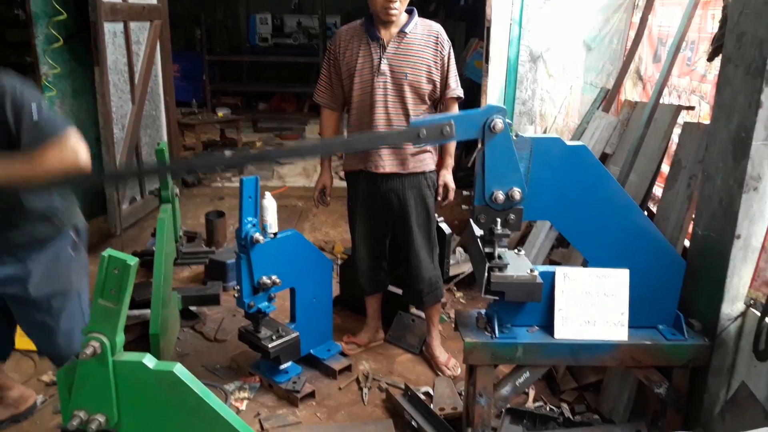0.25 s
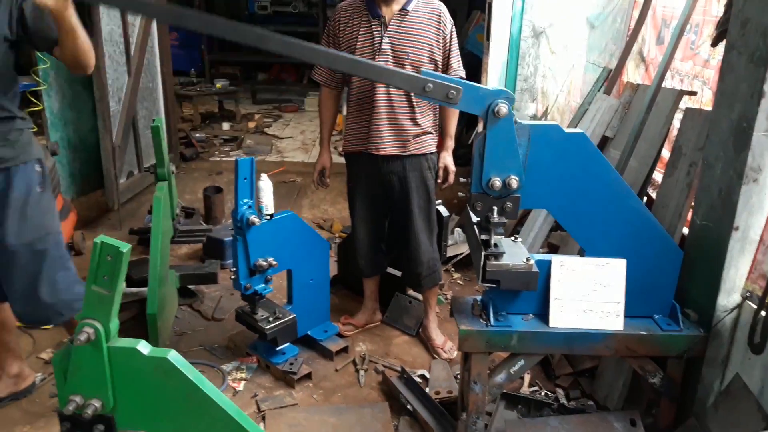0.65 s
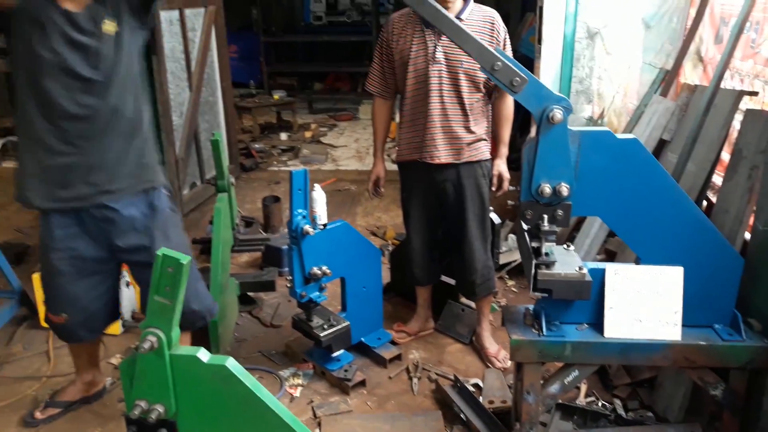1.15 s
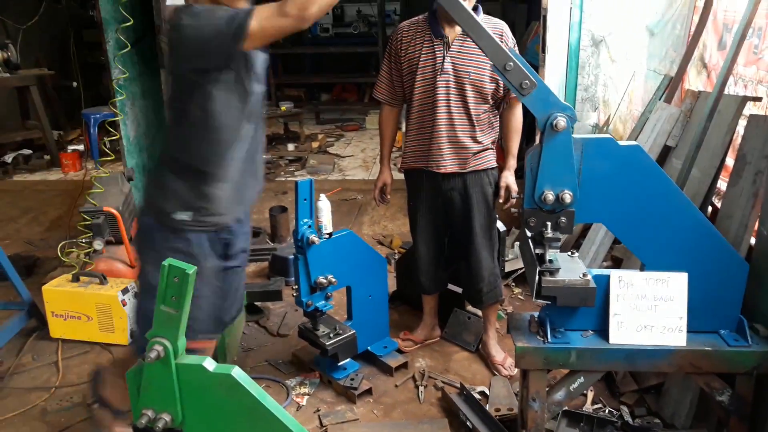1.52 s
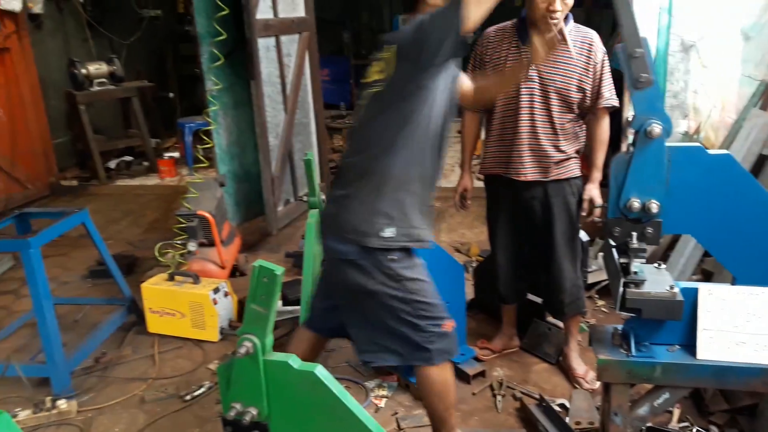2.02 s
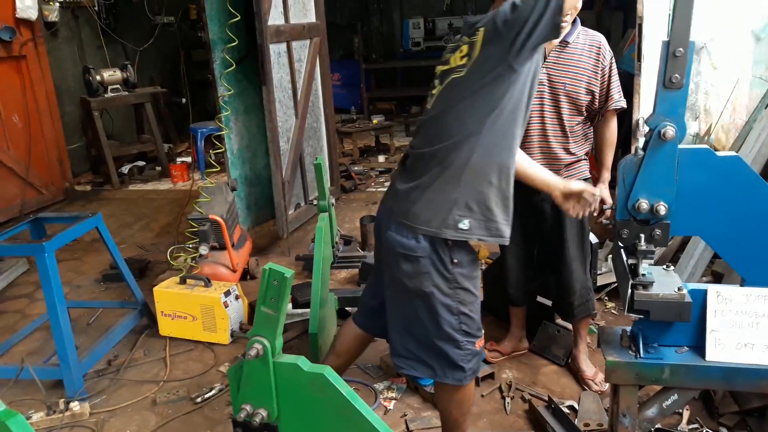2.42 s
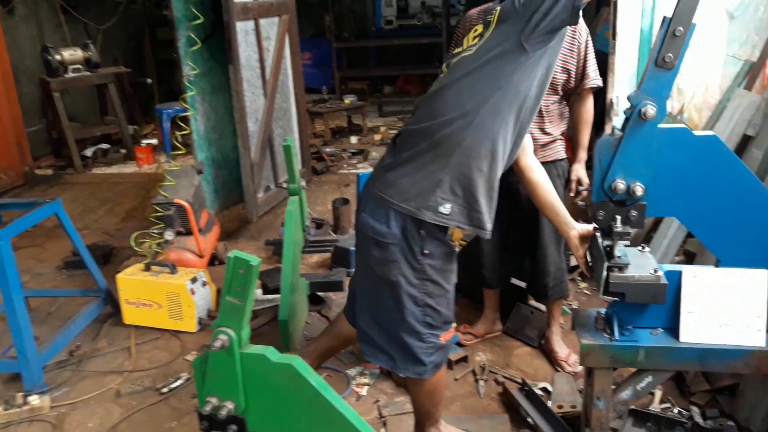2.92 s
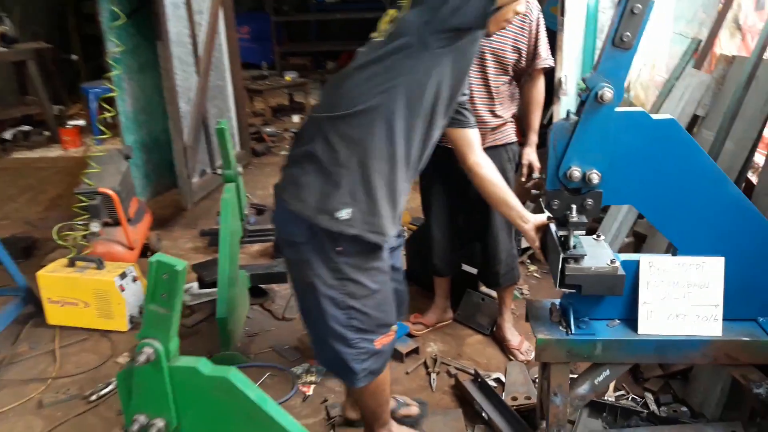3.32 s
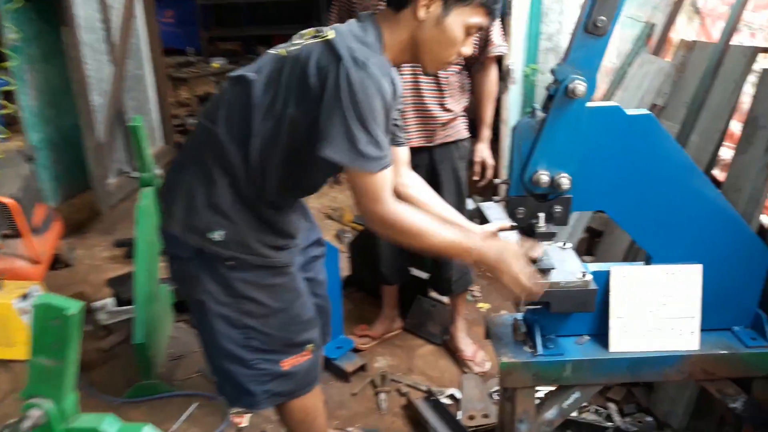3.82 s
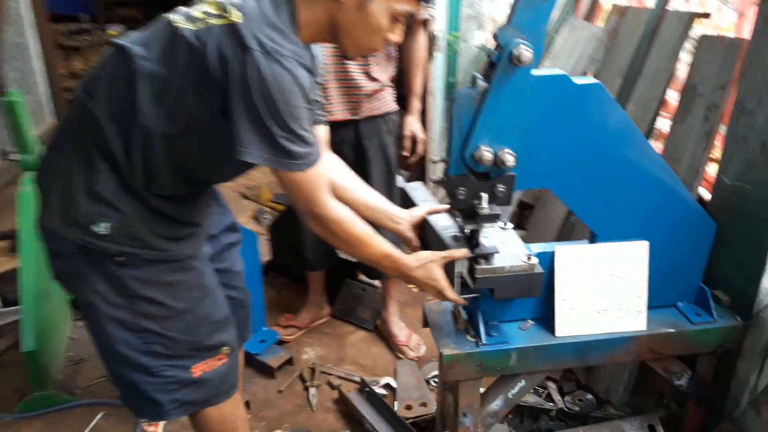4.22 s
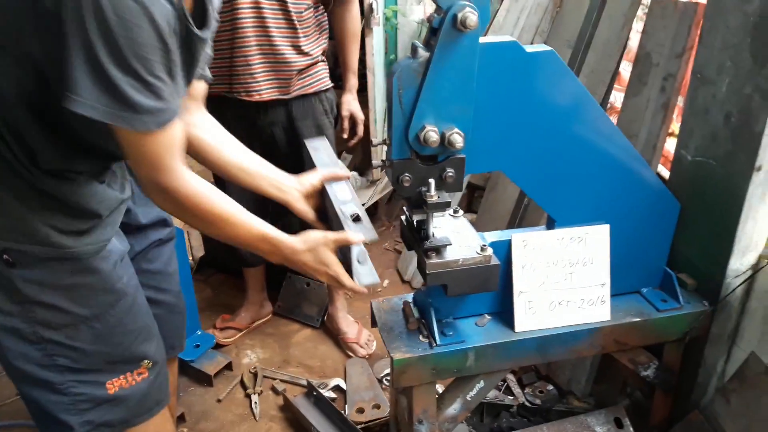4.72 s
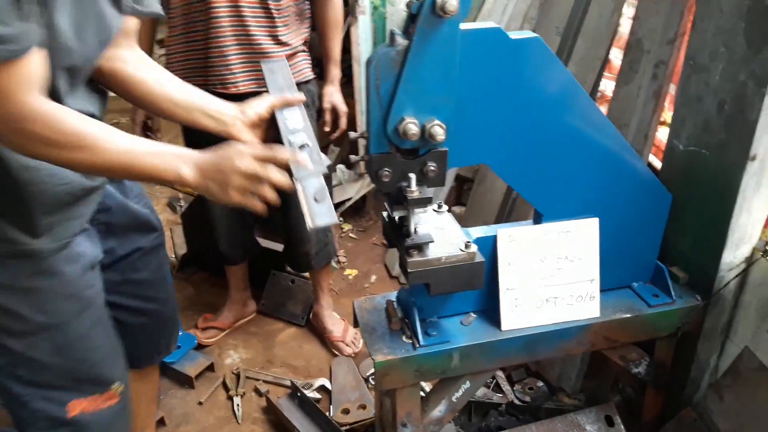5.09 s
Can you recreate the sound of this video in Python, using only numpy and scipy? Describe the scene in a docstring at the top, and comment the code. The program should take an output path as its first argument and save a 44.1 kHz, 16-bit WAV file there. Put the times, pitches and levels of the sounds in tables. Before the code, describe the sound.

Close to the microphone in an open workshop, a hand-lever press punches a steel bar with one sharp, ringing bang, and the bench thuds. The lever swings up and clanks against its stop. Small ticks, dull floor knocks and swishing clothes follow, then the bar clinks against the die and scrapes as it is pulled out. Farther off, chicks peep throughout over a low rumble.

```python
"""A hand-lever press, close to the microphone in an open workshop, punches a steel bar: one ringing bang.
The steel cracks and snaps, the frame rings and the bench thuds. The lever is swung up and clanks on its
stop; ticks and floor knocks follow, then the bar clinks against the die and scrapes as it is drawn out.
Clothes swish nearby. Farther off, chicks peep all the while in the echo of the shed,
and a distant bird calls over a low background rumble."""
import sys
import numpy as np
from scipy import signal
from scipy.fft import rfft, irfft
from scipy.io import wavfile
from scipy.ndimage import uniform_filter1d

SR = 44100
rng = np.random.default_rng(int(sys.argv[2]) if len(sys.argv) > 2 else 0)


def generate_wav(sig):
    """Save sig (samples, or channels by samples) to the path in sys.argv[1] as 16-bit PCM at SR."""
    pcm = np.round(np.clip(np.atleast_2d(sig).T, -1, 1) * 32767).astype(np.int16)
    wavfile.write(sys.argv[1], SR, pcm)


N = 235960
TIME = np.arange(N) / SR
AGE = np.arange(SR) / SR   # the second that follows a blow

# Levels in all tables are relative; t60 is the time a sound takes to fall by 60 dB.
# Ring of press and bar. Each row: frequency in Hz, level in dB, t60 in seconds, swell time in seconds.
PRESS_RING = [(581, -25, 0.52, 0.07), (716, -22, 0.33, 0.07), (1047, -32, 0.44, 0.003),
              (1550, -37, 0.8, 0.046), (1852, -38, 0.78, 0.001), (2090, -37, 0.8, 0.001),
              (2410, -14, 0.31, 0.004), (2827, -9, 0.39, 0.042), (2912, -19, 0.55, 0.07),
              (3010, -14, 0.39, 0.035), (3107, -18, 0.46, 0.004), (3126, -17, 0.49, 0.003),
              (3417, -16, 0.36, 0.005), (3600, -25, 0.8, 0.003), (3795, -31, 0.56, 0.004),
              (3973, -21, 0.46, 0.07), (4357, -32, 0.38, 0.002), (5130, -27, 0.26, 0.025),
              (5475, -5, 0.43, 0.07), (6479, -17, 0.42, 0.022), (6523, -8, 0.4, 0.07),
              (6869, -21, 0.34, 0.07), (7209, -14, 0.25, 0.07), (7460, -29, 0.45, 0.001),
              (7531, -11, 0.36, 0.07), (10060, -35, 0.33, 0.001), (10859, -29, 0.29, 0.002),
              (11650, -34, 0.26, 0.02), (13184, -26, 0.26, 0.029), (15020, -17, 0.23, 0.066)]
# Clear modes of each struck body. Each row: frequency in Hz, level in dB, t60 in seconds.
BENCH_RING = [(165, -42.5, 0.17), (367, -45, 0.13), (848, -39, 0.11)]
LEVER_RING = [(475, -24, 0.12), (627, -32.5, 0.27), (998, -26.5, 0.17), (1160, -35, 0.18),
              (1437, -43.5, 0.73), (1533, -31.5, 0.19), (1754, -96, 0.075), (2230, -50.5, 0.19),
              (2400, -45, 0.36), (2516, -19.5, 0.091), (2870, -34.5, 0.4), (3170, -27, .17),
              (3420, -28.5, 0.41), (3480, -36.5, 0.34), (3661, -26.5, 0.29), (4200, -38, 0.37),
              (3900, -48, 0.28), (4400, -22, 0.072), (4850, -49, .35), (5420, -50, 0.42), (6450, -41, 0.3),
              (6700, -48, .35), (6638, -48, 0.31), (7133, -41, 0.29), (7360, -45, 0.51)]
BAR_RING = [(884, -31, 0.09), (981, -30, 0.24), (1530, -26, 0.41), (1570, -43, 0.44), (1739, -52, 0.25),
            (1890, -30.5, 0.32), (2350, -41, 0.27), (2635, -37.5, 0.522), (2855, -57, 0.41),
            (2910, -39.5, 0.67), (3030, -48, 0.32), (3410, -42, 0.26), (3970, -39, 0.34), (4600, -46, 0.14),
            (4650, -41.5, 0.53), (4780, -47, 0.37), (5520, -45, 0.26), (5900, -44, 0.24), (6260, -52, 0.28),
            (6730, -50, 0.22), (6874, -51, 0.24), (7350, -49, 0.3), (7200, -53, 0.28), (7700, -54.5, 0.27),
            (8900, -47, .3), (10200, -48, 0.26), (11500, -47, 0.41)]
FLOOR_RING = [(417, -26.5, 0.055), (442.6, -37, 0.11), (582, -46, 0.16)]
TICK_CRACK = [(3320, -9, 0.0031), (5500, -14, 0.0037), (7400, -19.5, 0.0063), (11780, -22, 0.003)]
TICK_RING = [(278, -18, 0.026), (627, -31, 0.023)]
# Crowds of weak modes. Each row: frequency in Hz, level in dB per Hz, t60 in seconds.
PRESS_CROWD = [(302, -79, 0.2), (677, -65, 1), (1740, -67, 1), (2350, -52, 0.45), (3270, -44.5, 0.6),
               (3670, -55, 0.58), (5300, -58.5, .35), (6000, -58.5, .4), (7400, -46, .42),
               (7700, -63, 0.85), (11700, -63.5, 0.25), (12500, -73.5, .32), (13490, -62, 0.3),
               (15500, -58, .25)]
BENCH_CROWD = [(130, -74, 0.15), (230, -65, 0.14), (496, -64.5, 0.23), (1520, -65.5, .2), (4000, -66, 0.19),
               (12000, -90, .1)]
LEVER_CROWD = [(120, -71, 1), (254, -63.5, 0.12), (350, -49.5, 0.096), (450, -48, 0.15), (710, -65, 0.6),
               (1250, -56, 0.33), (1780, -64.5, 0.54), (3360, -59.5, 0.36), (4530, -66.5, 0.74),
               (5200, -72.5, 0.38), (7700, -67, 0.32), (8100, -79.5, 0.5), (15000, -83, 0.36)]
BAR_CROWD = [(310, -74, 0.25), (696, -66.5, 0.39), (990, -76, 0.55), (1480, -64.5, 0.377),
             (1897, -68, 0.41), (2450, -67, 0.22), (3910, -68, 0.55), (5170, -82, 0.51), (7440, -75, 0.53),
             (8350, -90, 0.67), (15000, -78, 0.24)]
FLOOR_CROWD = [(119, -76, 0.14), (260, -60, 0.08), (450, -61, 0.12), (970, -65, 0.26), (3000, -72, 0.078),
               (7900, -81.5, 0.16), (14700, -76, .1)]
# Blows on each body. Each row: start in seconds, level in dB, contact low-pass in Hz.
BENCH_HITS = [(.214, 0.5, 2500), (.25, -9, 700)]
LEVER_HITS = [(1.21, -20.5, 3550), (1.255, 2.5, 3210), (1.268, -8, 3330), (1.31, -9, 8900),
              (1.325, -12, 4100), (1.416, -16, 5070), (1.485, -26, 3840)]
BAR_HITS = [(3.585, -22.5, 8900), (3.615, -11.5, 4700), (3.642, -42, 8950), (4.212, -18.5, 6080),
            (4.232, -11, 3430), (4.273, -10, 10000), (4.32, -3.5, 3430), (4.348, -11.5, 9300)]
FLOOR_HITS = [(.53, -11.5, 1204), (1.09, -15.5, 700), (2.888, -17.5, 2480), (2.957, -3.5, 740),
              (2.993, -13, 916), (3.15, -16.5, 1500), (3.447, -13.5, 8800), (3.472, -17, 7160)]
# Sharp ticks close by. Each row: start in seconds, level in dB, high-pass in Hz.
NEAR_TICKS = [(0.566, -15.5, 8050), (0.5737, -18, 5560), (.7555, -21, 3500), (1.7196, -4.5, 98),
              (3.9205, -35, 1980)]
# Rubbing strokes. Each row: time of the peak in seconds, width in seconds, level in dB.
BAR_STROKES = [(3.64, 0.039, -48.5), (4.8, 0.0051, -49.5), (4.827, 0.0023, -57), (4.853, 0.02, -34),
               (4.94, 0.057, -52)]
CLOTH_STROKES = [(.62, 0.2, -54.5), (1.01, 0.017, -61), (1.255, 0.036, -49.5), (1.68, 0.069, -53),
                 (2.018, 0.023, -40), (2.05, 0.081, -53.5), (3.38, 0.16, -65), (4.75, 0.02, -58),
                 (4.92, 0.038, -48), (5.35, 0.039, -60.5)]
# Spectra of sliding steel, cloth and the background. Each row: frequency in Hz, level in dB.
SLIDE_SPECTRUM = [(400, -13), (1000, 0.5), (1500, 3), (2200, 6), (3200, -3), (4500, -3), (7500, -3.5),
                  (8500, -17.5), (15000, -23)]
CLOTH_SPECTRUM = [(300, -12), (1000, 5), (3000, 0), (4500, 2.5), (6000, -1.5), (7700, 1), (8100, -8),
                  (15000, -9)]
BACKGROUND_SPECTRUM = [(25, -45), (40, -16.5), (60, -2.5), (85, -3.5), (135, 3), (200, -3), (330, -8),
                       (700, -14), (1600, -15), (3000, -23), (5500, -31), (7700, -32), (8100, -42),
                       (15000, -37.5)]
# Peeps. Each row: start in seconds, length in seconds, starting pitch in Hz, level in dB, voice.
CHICK_PEEPS = [(-.14, .22, 4300, -53, "sliding"), (.13, .245, 4250, -39.5, "holding"),
               (.493, .275, 4450, -52, "sliding"), (.645, .265, 4620, -41.5, "holding"),
               (.99, .235, 4350, -52, "sliding"), (1.16, .2, 4270, -44, "holding"),
               (1.59, .235, 4250, -50, "sliding"), (1.685, .228, 4200, -39, "holding"),
               (2.095, .2, 4280, -53, "sliding"), (2.56, .22, 4280, -51, "sliding"),
               (2.585, .24, 4000, -47.5, "holding"), (3.024, .225, 4280, -50, "sliding"),
               (3.505, .2, 4230, -47.5, "sliding"), (3.883, .35, 3580, -52, "low"),
               (3.956, .205, 4200, -50.5, "sliding"), (4.25, .22, 4200, -46, "holding"),
               (4.495, .24, 4150, -50, "holding"), (4.889, .275, 3800, -49, "low"),
               (4.975, .21, 4250, -55, "sliding"), (5.228, .17, 4200, -46, "holding")]
# Chick voices. Each row: even sag and late drop as shares of the starting pitch, lateness of the drop
# as a power, skip at the voice break in Hz, swell over the peep in dB, level of the octave in dB.
CHICK_VOICES = {"sliding": (.16, .24, 2.6, 250, 2, -6.5), "holding": (.045, .38, 3.8, 200, 4, -16),
                "low": (.13, .12, 4, 0, 1, -20)}
# Far calls. Each row: start in seconds, length in seconds, end pitch in Hz, top pitch in Hz, level in dB.
BIRD_CALLS = [(2.263, 0.11, 795, 800, -56.5), (4.69, 0.277, 818, 875, -47)]
# Echo of the shed. Each row: frequency in Hz, level in dB, t60 in seconds.
SHED_ECHO = [(200, 14, 0.42), (1000, 6, 0.99), (3740, -7.5, 0.57), (15000, -21.5, 0.13)]
# Course of the whole background, and of its hiss on top of that. Each row: time in seconds, gain in dB.
BACKGROUND_LEVEL = [(0.0, -48.5), (0.54, -51), (1.0, -55), (4.13, -53), (4.81, -51.5), (5.35, -50)]
HISS_LEVEL = [(0, 2), (2.2, 5), (2.6, -0.5), (3.05, 5), (5.35, -2)]


def punch(crack_s=.0555, break_s=.0603, shimmer=.13, damp_s=.39):
    """The steel cracks, then snaps; the freed frame rings and passes its energy to swelling modes."""
    out = np.zeros(N)
    add(out, crack_s, from_db(-13) * wash(PRESS_CROWD) * fade(.1))
    add(out, break_s, wash(PRESS_CROWD) * fade(.23))
    add(out, break_s, from_db(-3) * wash(PRESS_CROWD, ripple(depth_db=7, width_hz=160)))
    damping = np.exp(-(AGE / damp_s) ** 4)   # the lever comes to rest and damps the last of the ring
    for hz, db, t60, swell_s in PRESS_RING:
        waver = 1 + shimmer * drift(35)[:SR]   # reflections make each ring waver in strength
        envelope = (1 - np.exp(-AGE / swell_s)) * damping
        add(out, break_s + rng.random() / hz, mode(hz, db, t60) * envelope * waver)
    return out


def blows(hits, modes, crowd, ring_db, spread_db, attack_s):
    """Every blow wakes the same modes with strengths of its own; a soft contact is duller."""
    out, body = np.zeros(N), ripple(depth_db=6.5, width_hz=29)
    rings, overlap = np.array([mode(*row) for row in modes]), SR // 20
    attack = 1 - np.exp(-AGE / attack_s)
    for start, db, contact_hz in hits:
        # a rebound feeds each ring that is still sounding
        sounding = low_pass(rings[:, :overlap], contact_hz) @ out[round(start * SR):][:overlap]
        signs = np.sign(sounding + 1e-9 * rng.standard_normal(len(modes)))
        strengths = signs * from_db(ring_db + spread_db * rng.standard_normal(len(modes)))
        blow = low_pass(strengths @ rings + wash(crowd, body), contact_hz)
        add(out, start, from_db(db) * blow * attack)
    return out


def bench_thuds():
    """The bench under the press thuds with the jolt of the punch."""
    return blows(BENCH_HITS, BENCH_RING, BENCH_CROWD, ring_db=4, spread_db=4, attack_s=.004)


def lever_clanks():
    """Close up, the lever meets its stop and rocks against it."""
    return blows(LEVER_HITS, LEVER_RING, LEVER_CROWD, ring_db=-7, spread_db=4, attack_s=.0015)


def bar_clinks():
    """Close up, the steel bar touches the die and rings."""
    return blows(BAR_HITS, BAR_RING, BAR_CROWD, ring_db=-3, spread_db=2.5, attack_s=.0014)


def floor_knocks():
    """Feet and tools knock dully on the workshop floor."""
    return blows(FLOOR_HITS, FLOOR_RING, FLOOR_CROWD, ring_db=2.5, spread_db=1, attack_s=.003)


def ticks():
    """Tiny cracks near the microphone, each with a brief low ring; the smaller ticks are thinner."""
    out = np.zeros(N)
    tick = sum(mode(*row) for row in TICK_RING) - sum(mode(*row) for row in TICK_CRACK)
    for start, db, corner_hz in NEAR_TICKS:
        high_pass = signal.butter(2, corner_hz, "high", fs=SR, output="sos")
        add(out, start, from_db(db) * signal.sosfilt(high_pass, tick + 1e-18))
    return out


def rubbing(strokes, spectrum, grain_db, grain_hz):
    """Friction noise swells and fades with each stroke; tiny slips make it grainy."""
    speed = sum(from_db(db) * np.exp(-.5 * ((TIME - peak) / width) ** 2) for peak, width, db in strokes)
    slips = rng.standard_normal(N) * from_db(grain_db * drift(grain_hz))
    return speed * coloured(slips, spectrum)


def chicks(quaver=.012, flutter_db=4, attack_s=.025, release_s=.035):
    """Thin whistles beyond the press sag, then drop; the octave comes out once the pitch is low enough."""
    out = np.zeros(N)
    wobble, flutter = 1 + quaver * drift(60), from_db(flutter_db * drift(45))
    for start, length, start_hz, db, voice in CHICK_PEEPS:
        sag, drop, lateness, skip_hz, swell_db, octave_db = CHICK_VOICES[voice]
        on = (TIME > start) & (TIME < start + length)
        age = TIME[on] - start
        progress = age / length
        hz = start_hz * (1 - sag * progress - drop * progress ** lateness) * wobble[on]
        hz -= skip_hz * under(hz, edge_hz=3480, width_hz=70)   # the voice breaks and skips down
        envelope = np.minimum(np.minimum(age / attack_s, (length - age) / release_s), 1)
        octave = from_db(octave_db) * under(hz, edge_hz=2980, width_hz=90)
        phase = 2 * np.pi * np.cumsum(hz) / SR
        whistle = np.sin(phase) + octave * np.sin(2 * phase)
        out[on] += from_db(db + swell_db * progress) * envelope * flutter[on] * whistle
    return out


def far_bird(quaver=.014):
    """Distance leaves one soft, gently arching tone of each call."""
    out, wobble = np.zeros(N), 1 + quaver * drift(40)
    for start, length, end_hz, top_hz, db in BIRD_CALLS:
        arch = np.sin(np.pi * np.clip((TIME - start) / length, 0, 1))
        hz = (end_hz + (top_hz - end_hz) * arch) * wobble
        out += from_db(db) * np.sqrt(np.abs(arch)) * np.sin(2 * np.pi * np.cumsum(hz) / SR)
    return out


def wall_bounce(x, delay_s=.0094, bounce_db=-5):
    """At the microphone a glide beats against its own reflection, which breaks it into beads."""
    return x + from_db(bounce_db) * np.interp(TIME - delay_s, TIME, x, left=0)


def workshop(x, wet_db):
    """The diffuse echo of the shed reaches the microphone just after the direct sound."""
    echo = wash(SHED_ECHO) * (AGE > .004)
    return x + from_db(wet_db) * signal.fftconvolve(x, echo / np.linalg.norm(echo))[:N]


def background(gain_db=3, split_hz=350):
    """Low background rumble with a faint hiss whose level dips and rises."""
    noise = coloured(rng.standard_normal(N), BACKGROUND_SPECTRUM)
    rumble = low_pass(low_pass(noise, split_hz)[::-1], split_hz)[::-1]   # both ways: no phase shift
    hiss = (noise - rumble) * from_db(np.interp(TIME, *np.transpose(HISS_LEVEL)))
    return from_db(gain_db + np.interp(TIME, *np.transpose(BACKGROUND_LEVEL))) * (rumble + hiss)


def mode(hz, db, t60):
    """One dying partial."""
    return from_db(db) * fade(t60) * np.sin(2 * np.pi * hz * AGE)


def wash(crowd, body=1):
    """Modes too dense to tell apart: noise in narrow bands, each dying at its own pace."""
    white = rfft(rng.standard_normal(SR)) * np.sqrt(SR / 2)
    hz = np.arange(len(white))
    spectrum = white * body * from_db(at_hz(crowd, hz))
    out, edges = np.zeros(SR), np.geomspace(60, 17000, 17)
    for low, high in zip(edges, edges[1:]):
        band = irfft(spectrum * ((hz >= low) & (hz < high)), SR)
        out += band * fade(at_hz(crowd, np.sqrt(low * high), column=2))
    return out


def ripple(depth_db, width_hz):
    """The uneven peaks and gaps of one body's response, as a gain for every Hz."""
    bumps = low_pass(rng.standard_normal(2 * SR), SR / (2 * width_hz))[-(SR // 2 + 1):]
    gain = from_db(depth_db * np.clip(bumps / bumps.std(), -2, 2))
    return gain / np.sqrt(uniform_filter1d(gain ** 2, size=900))


def fade(t60):
    """A decay that loses 60 dB in t60 seconds."""
    return np.exp(-np.log(1000) * AGE / t60)


def drift(rate_hz):
    """Smooth random wander with a spread of 1."""
    slow = low_pass(rng.standard_normal(N + SR), rate_hz)[SR:]
    return slow / slow.std()


def coloured(source, spectrum):
    """Give a signal a spectrum; rms 1."""
    out = irfft(rfft(source) * from_db(at_hz(spectrum, np.fft.rfftfreq(N, 1 / SR))), N)
    return out / out.std()


def at_hz(points, hz, column=1):
    """Read a spectrum on a log-frequency axis."""
    rows = np.array(points)
    return np.interp(np.log(np.maximum(hz, 1)), np.log(rows[:, 0]), rows[:, column])


def low_pass(x, hz):
    """Dull a signal above a corner."""
    return signal.sosfilt(signal.butter(2, min(hz, SR * .45), fs=SR, output="sos"), x)


def under(hz, edge_hz, width_hz):
    """A soft switch: 0 above the edge, 1 below it."""
    return .5 * (1 + np.tanh((edge_hz - hz) / width_hz))


def from_db(db):
    """Decibels to gain."""
    return 10 ** (np.asarray(db) / 20)


def add(track, start_s, sound):
    """Mix a sound into a track at a given moment."""
    start = max(round(start_s * SR), 0)
    track[start:start + len(sound)] += sound[:N - start]


def scene():
    """One microphone by the press: lever, bar and clothes up close, birds and rumble beyond."""
    impacts = lever_clanks() + bar_clinks() + floor_knocks() + bench_thuds()
    cloth = rubbing(CLOTH_STROKES, CLOTH_SPECTRUM, grain_db=1.5, grain_hz=200)
    bar_slide = rubbing(BAR_STROKES, SLIDE_SPECTRUM, grain_db=3, grain_hz=650)
    peeps = workshop(from_db(-5.6) * wall_bounce(chicks()), wet_db=-1.5)
    calls = workshop(far_bird(), wet_db=-16.5)
    close = punch() + impacts + bar_slide + cloth + workshop(ticks(), wet_db=-26.5)
    return (close + peeps + calls + background())[None]


def record(dry):
    """The microphone signal is cut steeply above 16 kHz."""
    return signal.sosfilt(signal.ellip(10, .2, 70, 16000, fs=SR, output="sos"), dry)


dry = scene()
out = record(dry)
generate_wav(out)
```